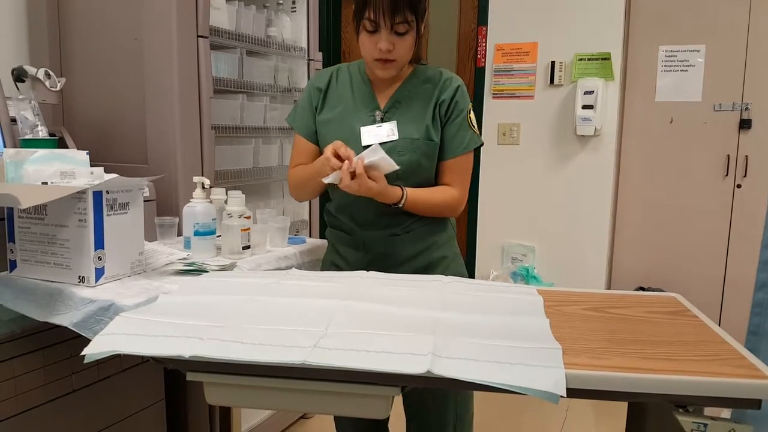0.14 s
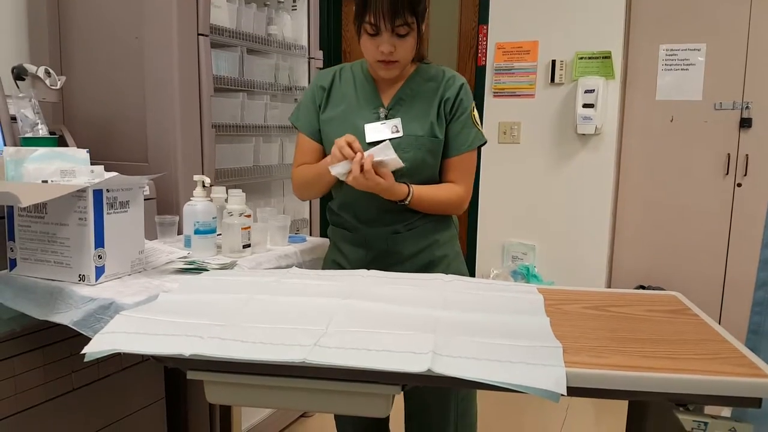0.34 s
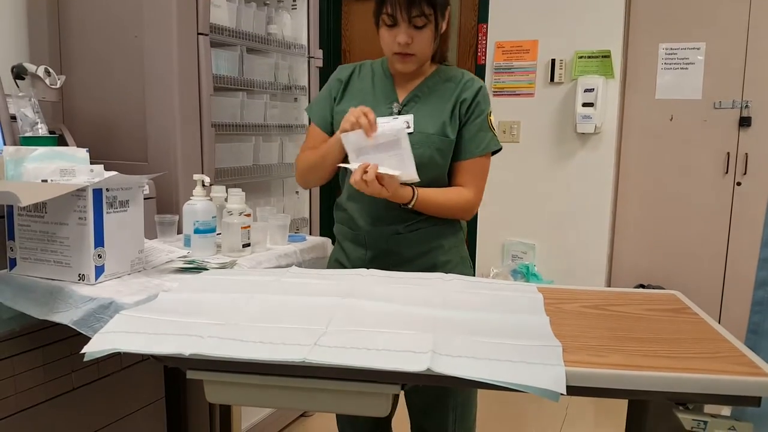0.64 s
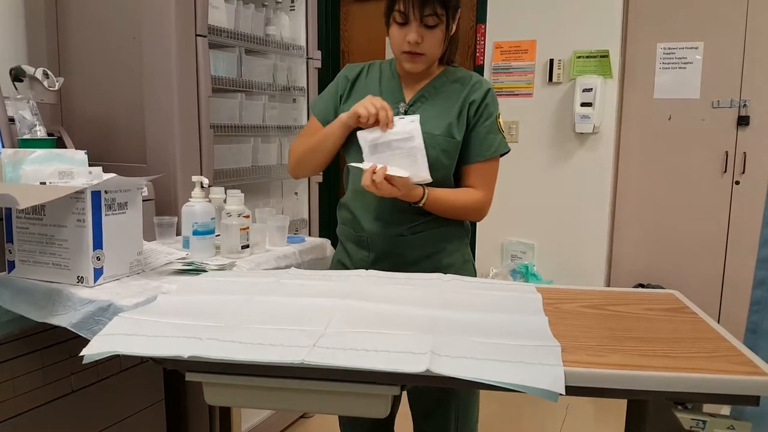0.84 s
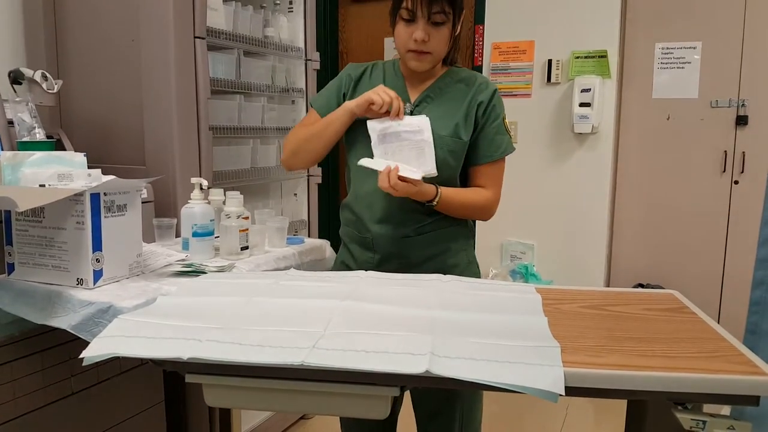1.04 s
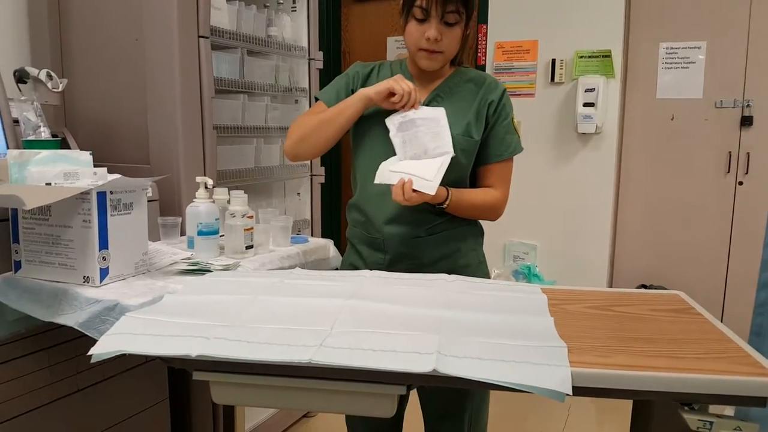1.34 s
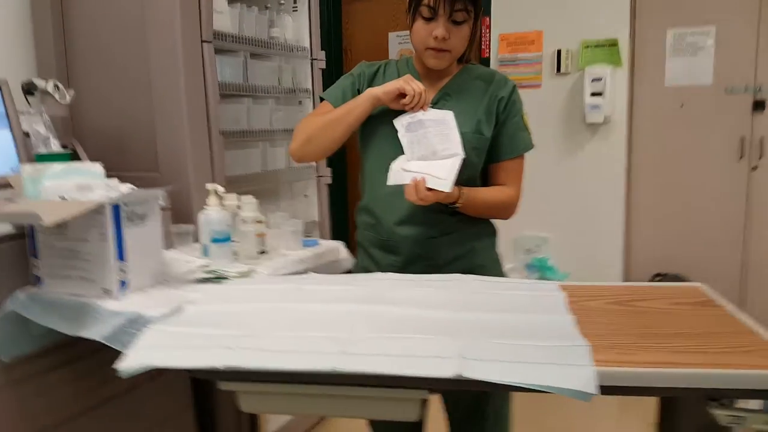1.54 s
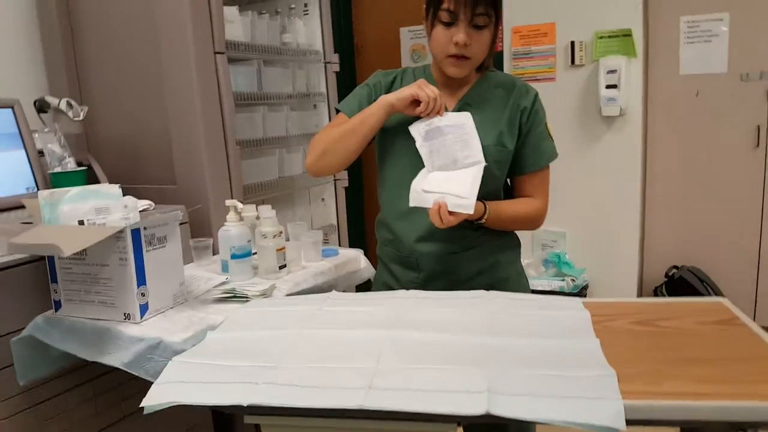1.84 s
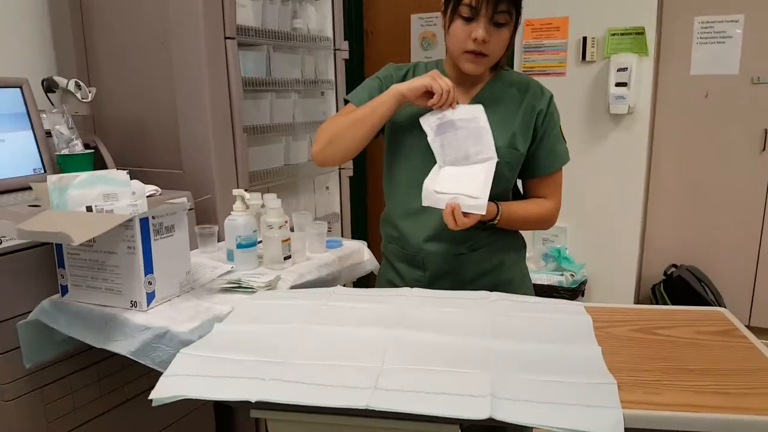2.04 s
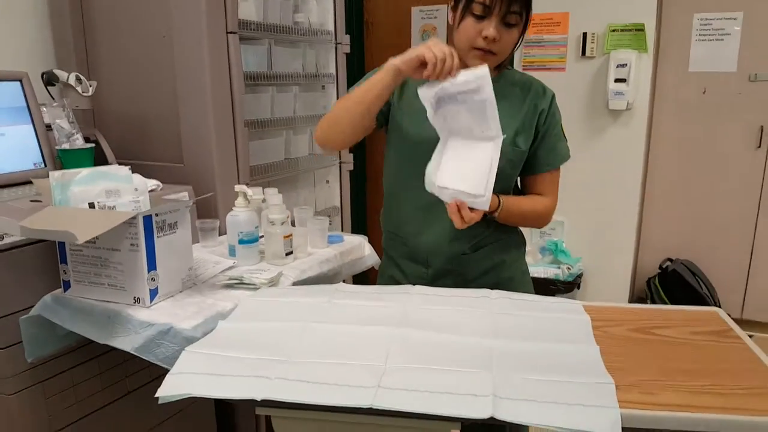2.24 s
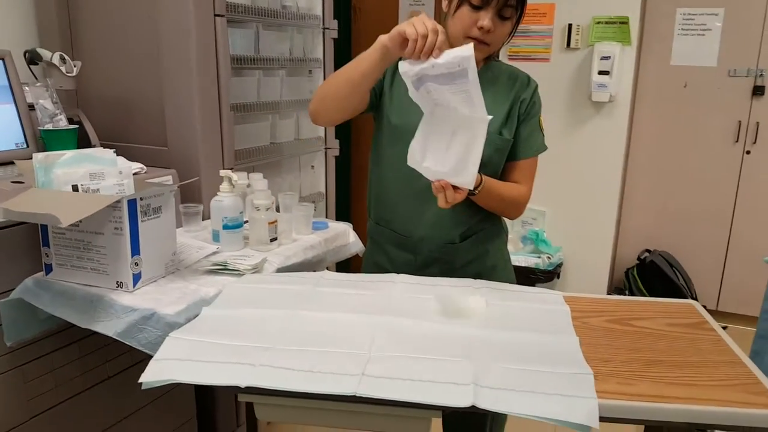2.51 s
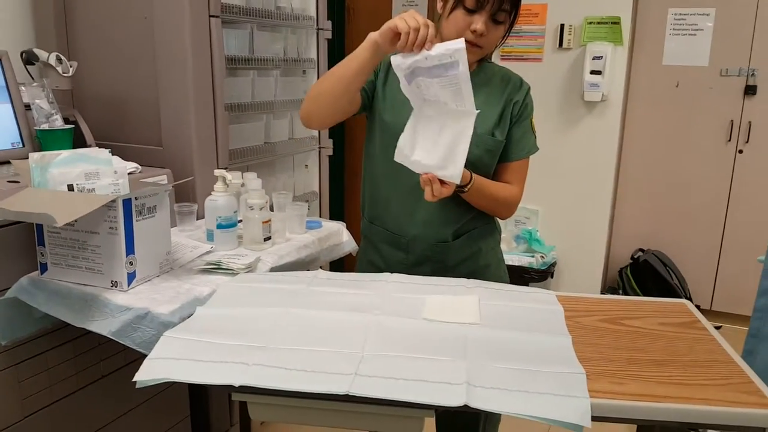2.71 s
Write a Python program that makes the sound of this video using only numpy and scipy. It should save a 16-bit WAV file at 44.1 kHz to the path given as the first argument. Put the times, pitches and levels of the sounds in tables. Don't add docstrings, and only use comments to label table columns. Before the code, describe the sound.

Crisp crinkling of a sterile-type paper and film wrapper, then stronger peeling snaps, a short lull, a shaking flurry and a faint soft thud, over steady air hum in a small reflective room, picked up by a phone.

```python
import sys
import numpy as np
from scipy import signal
from scipy.fft import rfft, irfft, next_fast_len
from scipy.io import wavfile

SR = 44100
rng = np.random.default_rng(int(sys.argv[2]) if len(sys.argv) > 2 else 0)


def store_wav(level_fs):
    pcm = np.round(np.clip(np.atleast_2d(level_fs), -1, 1) * 32767)
    wavfile.write(sys.argv[1], SR, pcm.T.astype(np.int16))


def makeup_ratio(level_db):
    decades = np.asarray(level_db, float) / 20
    return 10 ** decades


N = 126567
TOP_HZ, QUIET_TOP_HZ = 16950, 15800


def unit(x):
    return x / np.sqrt(np.mean(x ** 2, axis=-1, keepdims=True) + 1e-20)


def along(points, hz):
    point_hz, value = np.transpose(points)
    return np.interp(np.log(hz + 1), np.log(point_hz + 1), value)


def peak(f, hz, width_hz):
    return 1j * f * width_hz / (hz * hz - f * f + 1j * f * width_hz)


def filtered(x, response):
    n = x.shape[-1]
    size = next_fast_len(n + 2048)
    spectrum = rfft(x, size) * response(np.fft.rfftfreq(size, 1 / SR))
    return irfft(spectrum, size)[..., :n]


def noise_pair():
    return rng.standard_normal((2, N))


def pair(a, b, alike):
    def turn(f):
        return np.arccos(np.clip(along(alike, f), -1, 1)) / 2

    mid = filtered(a, lambda f: np.cos(turn(f)))
    side = filtered(b, lambda f: np.sin(turn(f)))
    return np.array([mid + side, mid - side])


# pitch_hz, density_db [dB per Hz]
AIR = [(12, -45), (20, -24.5), (129, -1), (333, -10), (549, -17.5), (881, -21.5), (15500, -47)]
# pitch_hz, width_hz, level_db
HUM = [(57, 16, -61.5), (118, 20, -54), (184.1, 19, -61), (238.8, 6.4, -60.5), (728, 29, -67.5)]
# pitch_hz, level_db, drift_hz
MOTOR = [(115.4, -52.5, 5.84), (541, -58, 2.98)]
# pitch_hz, likeness [-1..1]
ALIKE = [(25, 0.95), (130, 0.98), (500, 0.78), (1400, 0)]
AIR_DB = -48.5


def ventilation():
    rush = filtered(noise_pair(), lambda f: makeup_ratio(along(AIR, f)) * (f < QUIET_TOP_HZ))
    air = makeup_ratio(AIR_DB) * unit(rush)
    for hz, width_hz, db in HUM:
        air = air + makeup_ratio(db) * unit(filtered(noise_pair(), lambda f: peak(f, hz, width_hz) ** 2))
    for hz, db, drift_hz in MOTOR:
        waver = unit(filtered(noise_pair(), lambda f: f < 12))
        phase = 2 * np.pi * np.cumsum(hz + drift_hz * waver, axis=1) / SR
        air = air + makeup_ratio(db + 2.0 + 1.33 * waver[::-1]) * np.sin(phase)
    return pair(*air, ALIKE)


# pitch_hz, t60_s
WALLS = [(500, 0.097), (1500, 0.27), (4000, 0.14), (12000, 0.13)]
WALLS_DB = -6.5


def walls(lanes):
    noise = rng.standard_normal((len(lanes), 2, SR // 3))
    hz, t, z = signal.stft(noise, SR, nperseg=256)
    decay = makeup_ratio(-60 * t / along(WALLS, hz)[:, None])
    tail = signal.istft(z * decay, SR, nperseg=256)[1]
    tail = tail / np.linalg.norm(tail, axis=-1, keepdims=True)
    tail = np.pad(tail, ((0, 0), (0, 0), (130, 0)))
    wet = signal.fftconvolve(lanes, tail, axes=2)[..., :N].sum(axis=0)
    return makeup_ratio(WALLS_DB) * filtered(wet, lambda f: f < QUIET_TOP_HZ)


THUD_S, THUD_DB, THUD_HZ, THUD_T60_S = 2.59, -37, 129, 0.1


def pad_thud():
    t = np.maximum(np.arange(N) / SR - THUD_S, 0)
    return makeup_ratio(THUD_DB - 60 * t / THUD_T60_S) * np.sin(2 * np.pi * THUD_HZ * t)


# pitch_hz, density_db [dB per Hz]
SHEET = [(180, -20), (300, -7.5), (720, -4.5), (1140, -2.5), (2100, -1), (5660, -7), (15500, -13.5)]
# pitch_hz, width_hz, boost_db
POUCH = [(761, 136, 8), (2200, 280, 4.5)]


def sheet(f):
    pocket = sum((makeup_ratio(db) - 1) * peak(f, hz, width_hz) for hz, width_hz, db in POUCH)
    return makeup_ratio(along(SHEET, f)) * (1 + pocket)


# pitch_hz, likeness [-1..1]
PORTS = [(500, 1), (4000, 0.67), (14000, 0.2)]
LEAD_IN_S, RISE_S, PATCH_Q = .001, .0009, 9
OVERTONE, OVERTONE_DB = 1.67, -1
STRIKE = 2


def bursts(hz, bright_db, body_db, t60_s, patch_db, size):
    late = np.maximum(np.arange(size) / SR - LEAD_IN_S, 0)
    shape = (1 - np.exp(-late / RISE_S)) * makeup_ratio(-60 * late / t60_s[:, None])
    noise = rng.standard_normal((len(hz), 2, size)).transpose(1, 0, 2) * shape
    noise[0, :, round((LEAD_IN_S + RISE_S) * SR)] += STRIKE

    def mode(f, mode_hz):
        return peak(f, mode_hz[:, None], mode_hz[:, None] / PATCH_Q)

    def tone(f):
        bright = bright_db[:, None] / (1 + (6000 / (f + 1)) ** 4)
        body = body_db[:, None] / (1 + (f / 1500) ** 4)
        modes = mode(f, hz) + makeup_ratio(OVERTONE_DB) * mode(f, OVERTONE * hz)
        return sheet(f) * makeup_ratio(bright + body) * (1 + makeup_ratio(patch_db) * modes)

    x = pair(*filtered(noise, tone), PORTS)
    return x / np.abs(x.mean(axis=0)).max(axis=-1)[:, None]


def place(times_s, shapes):
    out = np.zeros((5, 2, N + SR))
    for k, s in enumerate(times_s):
        out[k % 5, :, round(s * SR):][:, :shapes.shape[-1]] += shapes[:, k]
    return out[..., :N]


# start_s, level_db
EFFORT = [(0, -55), (.5, -54), (.68, -67), (.9, -51.5), (1.04, -68), (1.33, -55), (1.46, -102), (1.62, -55),
          (1.72, -67.5), (2.1, -67), (2.2, -59), (2.3, -60), (2.47, -75), (2.58, -80), (2.6, -53),
          (2.635, -57.5), (2.67, -90)]
CRACKLES, CRACKLE_DB, CRACKLE_SPREAD_DB, CRACKLE_HZ = 450, 6.5, 17, 2600
RUB_DB = -4.5
TICK_T60_S = .008


def effort_db(t_s):
    start_s, level_db = np.transpose(EFFORT)
    return np.interp(t_s, start_s, level_db)


def rub():
    noise = filtered(noise_pair(), lambda f: sheet(f) * (f < QUIET_TOP_HZ))
    return pair(*unit(noise), PORTS) * makeup_ratio(effort_db(np.arange(N) / SR) + RUB_DB)


def crackle():
    u, g = rng.random((CRACKLES, 2)), rng.standard_normal((CRACKLES, 3))
    start_s = u[:, 0] * N / SR
    hz = np.clip(CRACKLE_HZ * np.exp(0.25 * g[:, 0]), 500, 12000)
    t60_s = np.full_like(hz, TICK_T60_S)
    shapes = bursts(hz, 4 * g[:, 1] - 4, 4 * g[:, 2], t60_s, patch_db=2.7, size=384)
    level_db = effort_db(start_s) + CRACKLE_DB + CRACKLE_SPREAD_DB * u[:, 1] ** 3
    return place(start_s, shapes * makeup_ratio(level_db)[:, None])


SNAP_DB, BRIGHT_REF_DB, BODY_REF_DB, PATCH_DB = -1, -19, -19, 10


def releases(start_s, level_db, hz, bright_db, body_db, t60_s):
    shapes = bursts(hz, bright_db - BRIGHT_REF_DB, body_db - BODY_REF_DB, t60_s, PATCH_DB, size=640)
    return place(np.maximum(start_s - LEAD_IN_S, 0), shapes * makeup_ratio(level_db + SNAP_DB)[:, None])


# start_s, level_db (peak), pitch_hz (patch), bright_db, body_db
TICKS = [(0.032, -28, 3080, -18, -22), (0.0597, -12.5, 2200, -2, -12), (0.068, -30, 3000, -3, -17),
         (0.139, -25, 3030, -5, -12), (0.367, -45, 1030, -30, 1), (0.372, -36, 4260, -15, -29),
         (0.406, -28.5, 2020, -26, -19), (0.4398, -32, 3000, -18, -20), (0.541, -25.5, 2130, -16, -25),
         (0.5435, -16.5, 4200, -11, -19), (0.563, -22, 4340, -4, -14), (0.574, -25.5, 3040, -11, -24),
         (0.642, -33, 4700, -35, -8), (0.686, -33.5, 3440, -10, 6), (0.703, -35, 4200, -31, -10),
         (0.782, -34, 3480, -21, -18), (0.806, -40, 2200, -31, -20), (0.885, -36, 1310, -19, -17),
         (0.93, -39, 2250, -35, -24), (0.964, -29.5, 4500, -14, -21), (1.091, -35, 7500, -35, -8),
         (1.107, -25.5, 1520, -13, -17), (1.2182, -30, 4470, -30, -27), (1.256, -32, 2350, -24, -35),
         (1.2862, -25, 3170, -33, -16), (1.325, -19, 3200, -22, -15), (1.332, -27, 2830, -29, -15),
         (1.3609, -15, 2070, -20, -13), (1.365, -23.5, 1980, -21, -14), (1.799, -39, 13800, 3, -35),
         (1.85, -45.5, 6040, -8, -30), (1.974, -47, 4000, -9, -21), (2.083, -43, 4000, -27, -11),
         (2.182, -31, 2100, -32, -4), (2.209, -42, 2700, -28, -17), (2.299, -25, 1810, -23, -7),
         (2.568, -41.5, 1390, -46, 10), (2.605, -46, 5000, -12, -25), (2.62, -39, 3200, -12, -25),
         (2.641, -44, 5760, -26, -27)]


def ticks():
    start_s, level_db, hz, bright_db, body_db = np.transpose(TICKS)
    t60_s = np.full_like(hz, TICK_T60_S)
    return releases(start_s, level_db, hz, bright_db, body_db, t60_s)


# start_s, level_db (peak), pitch_hz (patch), bright_db, body_db
FINGERING = [(0.0044, -19.5, 3440, -3.5, -15), (0.0238, -24.5, 2260, -3, -12.5),
             (0.0578, -19, 4340, -29.5, -17), (0.1146, -25.5, 2090, -24.5, -22.5),
             (0.1815, -29.5, 3420, -8, -18), (0.2034, -29, 3350, -11, -18), (0.2438, -25, 2200, 0, -20),
             (0.2578, -26.5, 3100, -10, -9), (0.3252, -28, 2970, 6, -25), (0.3481, -30, 2380, -18.5, -29),
             (0.4005, -24.5, 3200, -1, -30), (0.4474, -24, 2270, -8, -19), (0.4652, -24.5, 2390, -8, -17),
             (0.4978, -25, 2160, -8, -25), (0.5372, -19, 2260, -10, -11), (0.5522, -23, 2020, -20, -21),
             (0.5694, -29.5, 926, -20, -2), (0.6275, -34, 2200, -35, -21), (0.7442, -34, 2240, -41, -23),
             (0.7637, -29.5, 2200, -27, -36), (0.7724, -29.5, 2200, -25, -17),
             (0.8116, -23.5, 1600, -22, -20), (0.8345, -33.5, 1560, -18, -18)]
# start_s, level_db (peak), pitch_hz (patch), bright_db,
# body_db
PEELING = [(0.8743, -28.5, 1700, 2.5, 6), (0.8932, -31, 1580, -32, -8), (0.9444, -31, 1600, -39, -24),
           (0.956, -24, 2370, -19, -15), (0.9887, -22, 2440, -8, -21), (1.1021, -18.5, 2180, -6, -13),
           (1.1713, -25, 2240, -14, -17), (1.204, -10.5, 1520, -11.5, -15.5), (1.209, -26, 1540, -19, -2),
           (1.246, -30, 2340, -30, -25), (1.265, -25, 2200, -12, -42), (1.289, -19.5, 3080, -18, -24),
           (1.3071, -28, 2160, -19, -21), (1.3172, -16, 5670, -18, -21), (1.3222, -16, 1990, -17, -24),
           (1.34, -32, 2080, -41, -6), (1.351, -20, 3000, -14, -30), (1.3563, -16, 8100, -12.5, -10.5),
           (1.3823, -18.5, 8600, -13, -23), (1.3995, -15.5, 2720, -14, -18), (1.5647, -16.5, 780, -11, -17),
           (1.5669, -9.5, 5680, -18.5, -34), (1.5735, -26.5, 2090, -18, 0),
           (1.5995, -23.5, 1740, -11, -14),
]
# start_s, level_db, pitch_hz, bright_db, body_db
SHAKING = [(1.6072, -9.5, 3450, -14.5, -20), (1.7903, -43.5, 6500, -18, -20),
           (1.9296, -22, 3580, -21.5, -16), (2.0277, -36, 1870, -23, -12), (2.1208, -22, 2490, -16, -11),
           (2.1699, -16, 2740, -6.5, -15.5), (2.175, -17, 1900, -13.5, -11), (2.1941, -34, 2030, -47, -9),
           (2.2195, -31.5, 1570, -32, -13), (2.2603, -40, 2030, -28, 2), (2.2791, -11.5, 2600, -14, -16.5),
           (2.2866, -16, 2560, -13, -7), (2.2919, -8, 1870, 0, -10), (2.3057, -28.5, 1680, -16, -36),
           (2.3323, -18.5, 5040, -17, -19), (2.3359, -13.5, 1730, -7, -6), (2.3499, -14, 3610, -14.5, -54),
           (2.3827, -28, 2600, -12, -24), (2.4126, -32, 2600, -19, -6), (2.4242, -24.5, 3330, -13, -42),
           (2.5246, -36.5, 2730, -21, -16), (2.593, -32.5, 3860, -4, -25), (2.597, -31.5, 5800, -19, -36),
           (2.838, -42, 1980, -9, -18)]
AFTERS, AFTER_S, AFTER_DB = 5, 0.0087, -12.5
SNAP_T60_S = .0085


def snaps():
    rows = np.repeat(FINGERING + PEELING + SHAKING, AFTERS + 1, axis=0)
    start_s, level_db, hz, bright_db, body_db = rows.T
    after = np.arange(len(rows)) % (AFTERS + 1) > 0
    u = rng.random((len(rows), 3))
    wait = -np.log(1 - .95 * u[:, 0])
    start_s = start_s + after * AFTER_S * (0.26 + wait)
    level_db = level_db + after * (AFTER_DB - 3 * wait - 8 * u[:, 1])
    hz = hz * np.exp(after * 0.78 * (u[:, 2] - .4))
    t60_s = SNAP_T60_S * (1 + u[:, 1] / 2)
    return releases(start_s, level_db, hz, bright_db, body_db, t60_s)


# pitch_hz, level_db
LEAN = [(600, 0), (1300, 0), (2500, 0.5), (5500, -8), (9000, 1.5), (14000, 4.5)]
# pitch_hz, phase_rad
LEAD = [(2500, -1), (4000, -0.5), (9600, 2), (16000, 1)]


def off_centre(f):
    halves = [.5, -.5]
    lean_db = np.outer(halves, along(LEAN, f))
    lead_rad = np.outer(halves, along(LEAD, f))
    return makeup_ratio(lean_db) * np.exp(1j * lead_rad)


def scene():
    lanes = snaps() + crackle() + ticks()
    lanes[0] += rub() + pad_thud()
    packet = lanes.sum(axis=0) + walls(lanes)
    return filtered(packet, off_centre) + ventilation()


def band_limit(x):
    return signal.sosfilt(signal.butter(12, 17000, fs=SR, output="sos"), x)


def record(dry):
    def band(hz):
        shelf_db = np.clip((QUIET_TOP_HZ - hz) / 10, -32, 0)
        return (hz < TOP_HZ) * makeup_ratio(shelf_db)

    mix = filtered(dry, band)
    return band_limit(mix)


dry = scene()
out = record(dry)
store_wav(out)
```